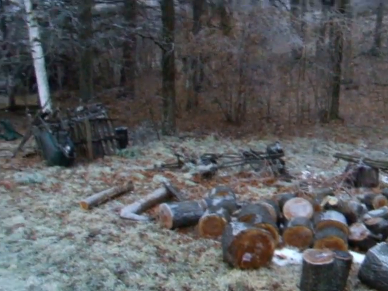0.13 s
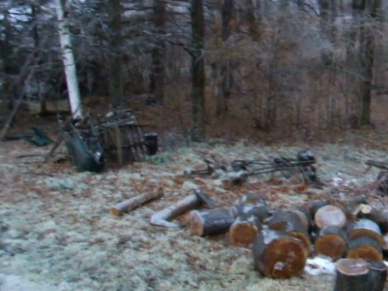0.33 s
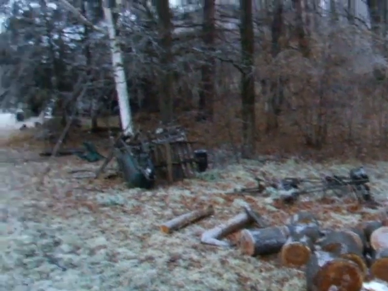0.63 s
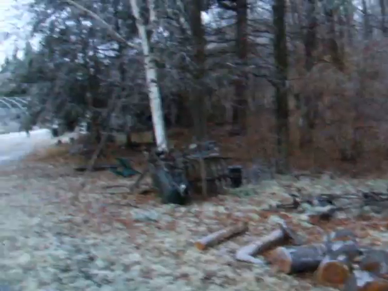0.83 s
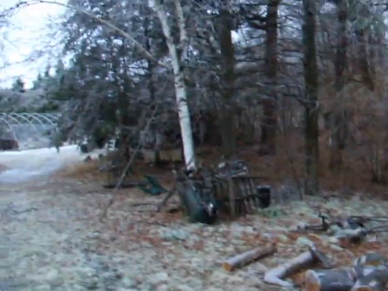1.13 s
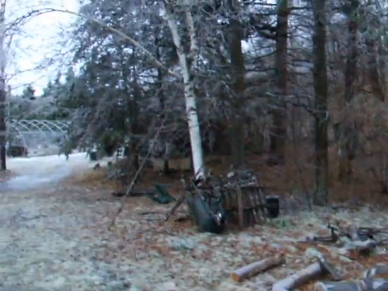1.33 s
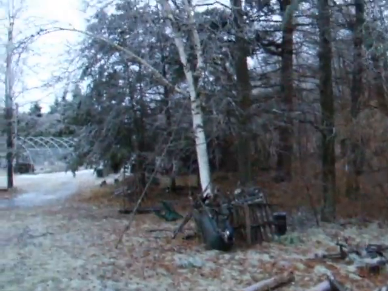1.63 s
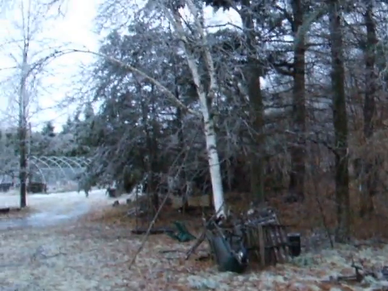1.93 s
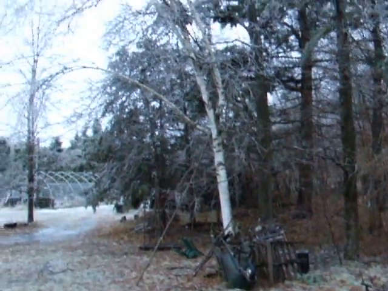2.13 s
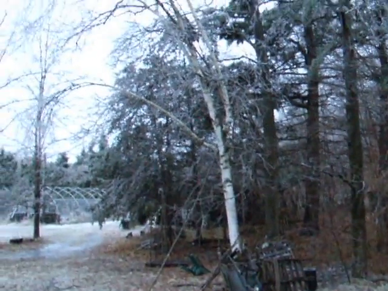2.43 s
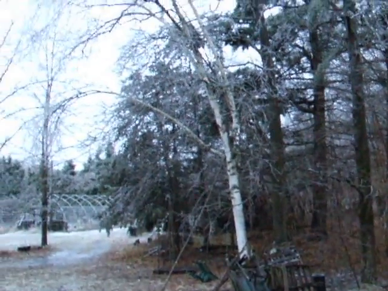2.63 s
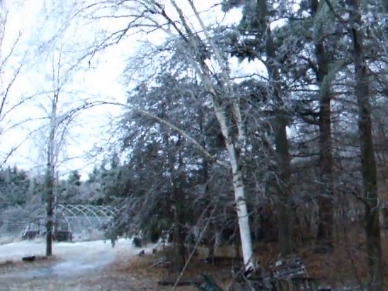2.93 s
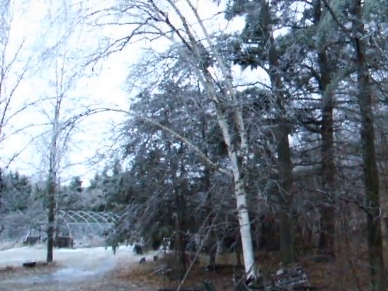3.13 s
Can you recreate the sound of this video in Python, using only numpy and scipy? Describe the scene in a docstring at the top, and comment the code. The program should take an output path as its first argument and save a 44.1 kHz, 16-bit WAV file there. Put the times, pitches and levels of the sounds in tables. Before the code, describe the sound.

Freezing drizzle makes a steady, patchy hiss and fine patter among trees, with irregular bright ticks on icy twigs, duller drips and a few soft low thuds; a small, gritty camera microphone adds a thin whine.

```python
"""Freezing drizzle in a wood

A fine patchy hiss and a patter of short tone grains lie under pellets ticking on ice-glazed twigs and
leaves: decaying sines with resonant noise. Duller drips ring lower; soft low thuds are sums of modes.
A small camera adds hum and a thin whine as sines; a far rumble is band-shaped noise.
Coarse conversion at 16 kHz makes the hiss gritty."""
import sys
import numpy as np
from scipy import signal
from scipy.fft import rfft, irfft, next_fast_len
from scipy.io import wavfile
from scipy.ndimage import uniform_filter1d, map_coordinates

SR = 44100
rng = np.random.default_rng(int(sys.argv[2]) if len(sys.argv) > 2 else 0)


def field_ratio(decibels):
    """Amplitude ratio for a level in dB (20 dB per decade); scalars and array-likes work."""
    return 10 ** (np.asarray(decibels, dtype=float) / 20)


def file_out(sig):
    """Save sig as 16-bit WAV at sys.argv[1]."""
    # one column per channel
    cols = np.atleast_2d(sig).T
    # limit, then scale
    lim = np.clip(cols, -1, 1)
    pcm = np.round(lim * 32767).astype(np.int16)
    wavfile.write(sys.argv[1], SR, pcm)


N = 145530


def unit(x):
    """Normalization: scale a signal to an rms of 1."""
    return x / np.sqrt(np.mean(x ** 2) + 1e-20)


def filtered(x, points):
    """Linear filtering: weight the spectrum by (frequency [Hz], gain [dB]) points on a log axis."""
    padded = next_fast_len(N + 8192)
    f, db = np.transpose(points)
    hz = np.fft.rfftfreq(padded, 1 / SR)
    gain = field_ratio(np.interp(np.log(hz + 1), np.log(f + 1), db))
    return irfft(rfft(x, padded) * gain, padded)[..., :N]


def wobble(rate):
    """Slow random modulation: a smooth curve through rate random knots a second."""
    knots = rng.standard_normal(int(N * rate / SR) + 4)
    return map_coordinates(knots, [np.arange(N) * rate / SR])


def place(times, rows):
    """Superposition: sum one waveform row per event, each starting at its time in seconds."""
    at = np.round(times * SR).astype(int)[:, None] + np.arange(rows.shape[1])
    return np.bincount(at.ravel(), rows.ravel(), N + 2 * SR)[:N]


# Drizzle strength over time: (time [s], level before the hiss trim [dB])
DRIZZLE_LEVEL = [(0.0, -52.5), (0.27, -52), (0.58, -53), (1.44, -52.5), (2.45, -54), (3.3, -53)]
# Spectral colour of the hiss, before scaling to unit rms: (frequency [Hz], relative density [dB])
HISS_COLOUR = [(15, 0.5), (50, -0.5), (100, -1), (200, 0.5), (400, 0.5), (800, 0.9), (2000, -0.5),
               (4000, -2.5), (6000, -1.4), (7500, 2), (8000, 1.5)]


def drizzle():
    """Incoherent superposition: far drops merge into patchy noise, nearer ones patter as short grains."""
    level = np.interp(np.arange(N) / SR, *np.transpose(DRIZZLE_LEVEL))
    return drizzle_hiss(level) + drizzle_patter(level)


def drizzle_hiss(level):
    """Filtered noise: random gains smoothed over frequency and time make the hiss patchy."""
    trim_db, patchy_db = -0.81, 1.54
    spectrum = signal.stft(rng.standard_normal(N + 512), nperseg=512)[2]
    across_frequency = uniform_filter1d(rng.standard_normal(spectrum.shape), 8, 0)
    patches = unit(uniform_filter1d(across_frequency, 6, 1))
    noise = signal.istft(spectrum * field_ratio(patchy_db * patches), nperseg=512)[1][:N]
    hiss = unit(filtered(noise, HISS_COLOUR + [(8001, -120)]))
    return field_ratio(level + trim_db + 0.19 * wobble(6.13)) * hiss


def drizzle_patter(level):
    """Shot noise: randomly timed damped sines of scattered pitch and size."""
    drops_per_s, centre_hz, log_spread = 450, 4200, .6
    decay_cycles, size_db, patter_db = 1.6, 4, -62.5
    count = int(drops_per_s * N / SR)
    times = rng.random(count) * N / SR
    size = np.minimum(rng.exponential(size=(count, 1)), 3.2)
    hz = centre_hz * np.exp(log_spread * rng.standard_normal((count, 1)))
    hz = np.clip(hz, 800, 7900)
    t = np.arange(400) / SR
    strength = field_ratio(size_db * size) * np.sqrt(hz / centre_hz)
    grains = strength * np.sin(2 * np.pi * hz * t) * np.exp(-hz * t / decay_cycles)
    # the slow swing is wider than that of the hiss
    swing_db = 1.5 * (level - level.mean()) + 2.4 * wobble(15)
    return field_ratio(patter_db + swing_db) * unit(place(times, grains))


def shaped_noise(hz, sharpness, t60, t):
    """Resonance: noise through a peak filter, decaying with the energy of its own envelope."""
    b, a = signal.iirpeak(min(hz, 7900), sharpness, SR)
    noise = signal.lfilter(b, a, rng.standard_normal(len(t)))
    envelope = field_ratio(-60 * t / t60)
    noise = noise * envelope
    return noise * np.linalg.norm(envelope) / np.linalg.norm(noise)


def impacts(table, sharpness, chatter_db, spray_db, rise):
    """Impact excitation: a damped ring at its pitch, with broader chatter and a faint longer spray."""
    delay_s = .0008  # fixed delay from listed time to the start of the ring
    t = np.arange(SR // 12) / SR
    rows = []
    for _, db, hz, t60 in table:
        ring = np.sin(2 * np.pi * hz * t) * field_ratio(-60 * t / t60)
        chatter = field_ratio(chatter_db) * shaped_noise(hz, sharpness, 1.9 * t60, t)
        spray = field_ratio(spray_db) * shaped_noise(hz, .7, .06, t)
        attack = 1 - np.exp(-t / (rise * t60))  # rise is a share of the ring's decay time
        rows.append(field_ratio(db) * attack * (ring + chatter + spray))
    return place(np.array(table)[:, 0] + delay_s, np.array(rows))


# Bright ticks on ice: (time before the fixed delay [s], nominal peak [dB], pitch [Hz],
# 60 dB decay time of ring [s])
ICE_TICKS = [(.0362, -27.5, 5030, .004), (.0887, -40, 6520, 0.0095), (.0925, -37.5, 7300, 0.0056),
             (.1511, -28, 4350, 0.0052), (.1576, -26.5, 5760, 0.0023), (.1698, -37.5, 4600, 0.0087),
             (.1764, -35.5, 7400, 0.005), (.2912, -27.5, 6070, 0.0087), (.2944, -28, 6120, 0.0051),
             (.3074, -30, 5700, 0.0033), (.4407, -24.5, 5600, 0.0018), (.4432, -26.5, 6200, 0.0013),
             (.6544, -38, 6700, 0.0037), (.8809, -33.5, 5000, 0.0017), (.9144, -36.5, 6850, 0.0046),
             (.927, -35, 3200, 0.0044), (.9964, -36, 3000, 0.002), (.8934, -34.5, 7870, 0.0039),
             (1.054, -32, 7040, 0.0042), (1.077, -28.5, 4200, 0.0013), (1.1880, -34, 3680, 0.0017),
             (1.2246, -24.5, 7300, 0.0031), (1.2266, -17, 7700, 0.0099), (1.2273, -35, 5750, 0.0096),
             (1.2273, -39, 4200, 0.0073), (1.2384, -33, 7540, 0.0039), (1.3234, -29.5, 4840, 0.0046),
             (1.517, -33.5, 5940, 0.0056), (1.5663, -31.5, 3350, 0.0062), (1.6611, -33.5, 3640, 0.0029),
             (1.6891, -33, 4400, 0.0036), (1.7564, -34, 4800, 0.0015), (1.7624, -33, 5420, 0.0023),
             (1.7664, -28.5, 6500, 0.0025), (1.9335, -30, 6480, 0.0028), (1.946, -29, 4200, 0.002),
             (2.0494, -34, 7180, 0.0059), (2.0594, -38, 5850, 0.0062), (2.0971, -33, 4540, 0.0018),
             (2.1296, -34.5, 3400, 0.0068), (2.1974, -39.5, 3400, 0.0027), (2.6698, -34.5, 6780, 0.0048),
             (2.8444, -34.5, 4500, 0.0038), (2.8539, -31.5, 6350, 0.0062), (2.9352, -36, 6500, 0.0047),
             (3.0824, -31.5, 3580, 0.0045), (3.1108, -35, 6350, 0.0029)]


def ticks():
    """Impact on a stiff surface: high, strongly damped rings with strong broad chatter."""
    return impacts(ICE_TICKS, sharpness=1.1, chatter_db=-9, spray_db=-18.5, rise=.057)


# Drips on leaves and bark: (time before the fixed delay [s], nominal peak [dB], pitch [Hz],
# 60 dB decay time of ring [s])
DULL_DRIPS = [(.1225, -35.5, 1840, 0.012), (.133, -38.5, 1616, 0.014), (.1512, -37, 3170, 0.0069),
              (.351, -34, 1790, 0.012), (.443, -37.5, 2380, 0.004), (.4595, -31.5, 1580, 0.0061),
              (.465, -36, 1105, 0.017), (.806, -45.5, 1344, 0.015), (1.077, -41.5, 1334, 0.012),
              (1.1965, -39.5, 1890, 0.0064), (1.1985, -34.5, 1587, 0.016), (1.224, -30.5, 2040, 0.01),
              (1.514, -41, 2020, 0.012), (1.565, -33, 964, 0.01), (1.567, -46, 1990, 0.0071),
              (1.633, -43.5, 880, 0.016), (1.661, -37.5, 1130, .01), (1.758, -49, 1290, 0.0084),
              (1.7625, -29.5, 1610, 0.0045), (1.765, -35, 3250, 0.003), (1.771, -45.5, 2000, 0.0094),
              (1.882, -36.5, 1288, .02), (1.891, -43.5, 790, 0.028), (1.9205, -34, 2170, 0.0037),
              (1.9315, -35.5, 2170, 0.013), (2.575, -43.5, 546, 0.026), (3.111, -31, 1610, 0.005)]


def drips():
    """Impact on a softer surface: lower rings, with weaker and narrower chatter than the ticks."""
    return impacts(DULL_DRIPS, sharpness=2.2, chatter_db=-12, spray_db=-15, rise=.055)


# Soft low contacts: (time [s], nominal peak [dB], nominal pitch [Hz], 60 dB decay time [s])
SOFT_THUDS = [(0.2581, -34, 253.4, 0.07), (0.2681, -26, 293.6, 0.053), (.46, -48, 249, 0.047),
              (1.22, -44.5, 274, 0.055), (1.466, -23, 251, 0.028), (1.480, -37, 205, 0.077),
              (1.516, -44, 430, 0.045), (1.567, -35, 253, 0.044), (1.655, -38, 290.5, 0.034),
              (1.663, -31.5, 279.7, 0.04), (1.673, -36.5, 164.2, 0.053), (1.885, -40.5, 240.6, 0.073)]


def thuds():
    """Modal superposition: a low main mode, partners above and below, and a rough woody rattle."""
    attack_s, phase_lead_s, sag_s = .0025, .0025, .0088
    times, db, hz, t60 = np.array(SOFT_THUDS).T[:, :, None]
    t = np.arange(SR // 5) / SR
    # a phase lead that settles makes each pitch start sharp and sag
    bent_time = t + phase_lead_s * (1 - np.exp(-t / sag_s))

    def mode(ratio):
        """Simple harmonic motion at a ratio of the nominal pitch."""
        return np.sin(2 * np.pi * ratio * hz * bent_time)

    b, a = signal.butter(2, [300, 850], "band", fs=SR)
    rattle = unit(signal.lfilter(b, a, rng.standard_normal((len(times), len(t)))))
    # higher modes die away faster
    upper = (0.17 * mode(1.2) + 0.3 * mode(1.9) * field_ratio(-60 * t / t60)) * field_ratio(-30 * t / t60)
    tone = mode(0.96) + upper + .25 * mode(.55) + 0.088 * rattle
    envelope = field_ratio(db - 60 * t / t60) * (1 - np.exp(-t / attack_s))
    return place(times[:, 0], envelope * tone)


# Hum partials: (frequency [Hz], rms level before wavering [dB])
HUM_PARTIALS = [(60, -69.5), (120, -79.5)]


def hum():
    """Harmonic synthesis: low sines whose level and phase waver."""
    waver_db = 1.2
    t = np.arange(N) / SR
    total = np.zeros(N)
    for hz, db in HUM_PARTIALS:
        level = field_ratio(db + waver_db * wobble(13))
        total += level * np.sin(2 * np.pi * hz * t + wobble(4.42))
    return np.sqrt(2) * total  # rms to peak


def whine():
    """Phase reversal: the picture circuit's sine flips its sign at every frame and sags within it."""
    line_hz, frame_hz, first_flip_s = 7867.13, 29.97, .0125
    rms_db, sag_db = -55.5, 0.4
    t = np.arange(N) / SR
    frame, part = np.divmod((t - first_flip_s) * frame_hz, 1)
    sign = 1 - 2 * (frame % 2)
    level = np.sqrt(2) * field_ratio(rms_db - sag_db * part)
    return sign * level * np.sin(2 * np.pi * line_hz * t)


# Far rumble over time: (time [s], level before the trim [dB])
RUMBLE_LEVEL = [(0.0, -73), (1.41, -71), (1.591, -65.5), (2.02, -73), (3.3, -66.5)]
# Spectral colour of the rumble, before scaling to unit rms: (frequency [Hz], relative density [dB])
RUMBLE_SPECTRUM = [(80, -37), (110, 1), (150, -0.5), (200, -13.5), (300, -58)]


def rumble():
    """Band-limited noise: a faint far rumble under a slow level curve."""
    trim_db = -2.5
    level = np.interp(np.arange(N) / SR, *np.transpose(RUMBLE_LEVEL))
    colour = [(1, -120)] + RUMBLE_SPECTRUM + [(400, -120)]
    return field_ratio(level + trim_db) * unit(filtered(rng.standard_normal(N), colour))


def scene():
    """Linear superposition of all sources, as one channel."""
    rain = drizzle() + ticks() + drips() + thuds()
    return (rain + hum() + whine() + rumble())[None]


def roll_off(x):
    """The treble ends steeply here."""
    return signal.sosfilt(signal.butter(12, 9420, fs=SR, output="sos"), x)


def record(dry):
    """Quantization and imaging: coarse steps at 16 kHz, then smoothing that leaves a mirror above 8 kHz."""
    rate_hz, step, bias = 16000, .0054, .0003
    slope_hz = 1100  # half width of the smoothing slope about 8 kHz
    many, few = (N // 441 + 2) * 441, (N // 441 + 2) * 160  # lengths at 44.1 and 16 kHz
    samples = irfft(rfft(dry, many)[:, :few // 2 + 1], few) * few / many
    # so quiet a scene mostly toggles between two steps
    steps = step * np.floor((samples + bias) / step)
    hz = np.fft.rfftfreq(many, 1 / SR)
    slope = np.clip((hz - rate_hz / 2) / slope_hz, -1, 1)
    smoothing = (1 - np.sin(np.pi / 2 * slope)) / 2
    # the spectrum of a sampled signal repeats at its sample rate
    mirrored = np.fft.fft(steps)[:, np.arange(len(hz)) % few]
    mix = irfft(mirrored * smoothing, many)[:, :N] * many / few
    return roll_off(mix)


dry = scene()
out = record(dry)
file_out(out)
```